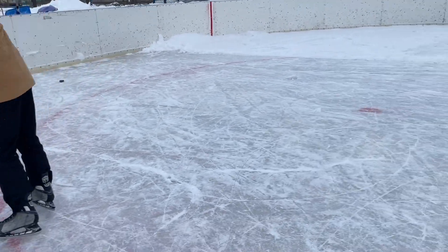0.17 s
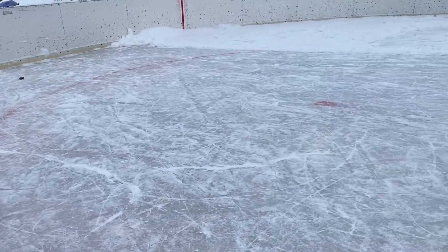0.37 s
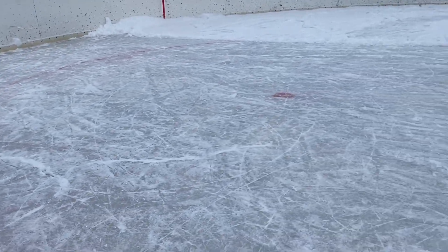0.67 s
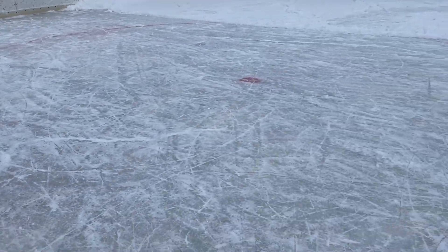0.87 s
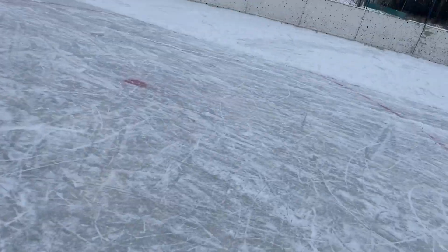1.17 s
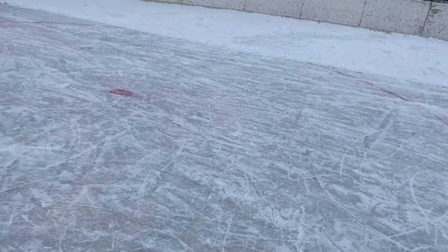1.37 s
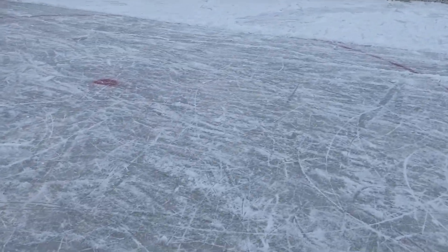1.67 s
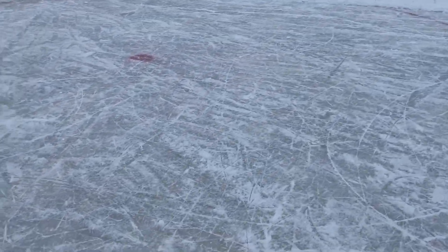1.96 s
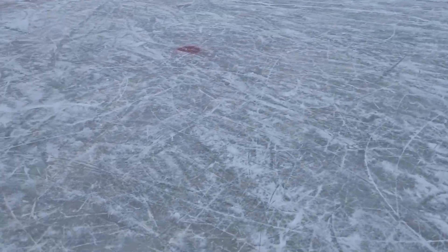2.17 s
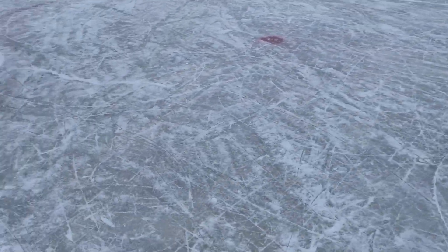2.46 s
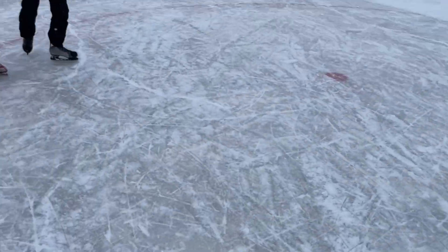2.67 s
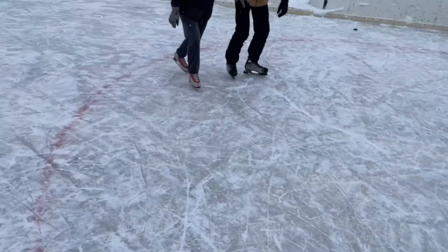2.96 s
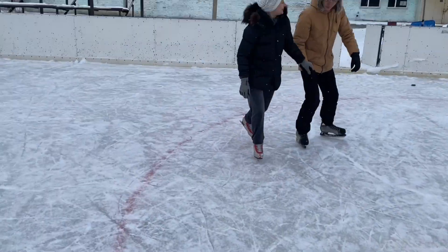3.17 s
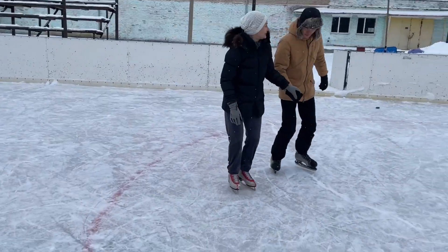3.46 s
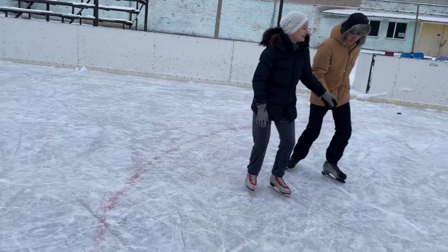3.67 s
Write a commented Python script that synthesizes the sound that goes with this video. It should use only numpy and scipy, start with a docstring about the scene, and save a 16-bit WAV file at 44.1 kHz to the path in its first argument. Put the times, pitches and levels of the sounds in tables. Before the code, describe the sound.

Skate blades crackle steadily on outdoor rink ice; low knocks come first, then a loud close edge scrape near one second, then repeated gritty strokes and clicks. Close stereo phone microphone, slightly stronger on the left.

```python
"""Outdoor ice rink: two skaters shuffle near a phone. Their blades crush the ice in dense random grains,
coloured into scraping strokes and a steady crackle; one edge bites close by and rings its steel and boot.
Knocks cross the ice sheet as dispersive bending waves, treble first, and arrive as short falling chirps.
Blade clicks are brief bursts of noise, a tapped runner is two decaying sines, and the gliding blades'
rumble is dispersed grain noise."""
import sys
import numpy as np
from scipy import signal
from scipy.fft import rfft, irfft
from scipy.io import wavfile
from scipy.ndimage import map_coordinates

SR = 44100
rng = np.random.default_rng(int(sys.argv[2]) if len(sys.argv) > 2 else 0)


def master_out(mix):
    """Clip the mix to full scale and print it as 16-bit PCM to the path in sys.argv[1]."""
    frames = np.transpose(np.atleast_2d(mix))
    ceiling = np.clip(frames, -1, 1)
    pcm = np.round(ceiling * 32767).astype(np.int16)
    wavfile.write(sys.argv[1], SR, pcm)


N = 167580  # samples in the scene
BLOCK, LEAD_S = 16384, 0.04  # samples in an event's block, and its time before the event
SIDES = np.array([[1], [-1]])  # left, right

# Blade contact: length of the linear attack, time constant of the release
ATTACK_S, RELEASE_S = 0.0093, 0.012
# Widths of resonances: standard deviation of a bell curve in octaves
BODY_OCTAVES, RASP_OCTAVES, KNOCK_OCTAVES, CLICK_OCTAVES = 0.62, 0.12, 0.76, 0.85
TRAVEL_S = 0.005  # travel time through the ice at 1 kHz

# Ring of runner and holder: level against the direct crack before its bass is cut, time constant
SKATE_RING_DB, SKATE_DECAY_S = -6.5, 0.0068
CRACK_DB = -8  # coarse cracks against fine grit
RASP_DB = 6  # gain of the edge resonance
WOBBLE, WOBBLE_HZ = 0.024, 14  # rms shift as a share of the rasp's pitch, and its rate

STEEL_T60_S = 0.25  # time for ringing steel to fall 60 dB
RING_DB = -18  # ringing modes against the direct steel sound
STEEL_DB, BOOT_DB = 1.5, 2  # gains added to the level curves of the bite
BITE_PAN_DB, GLIDE_PAN_DB, STROKE_PAN_DB = 3.5, 3.5, 1.5  # left over right, where the share is 1

JUDDER_DB, JUDDER_S = -13, 0.016  # judder rms against the chirp peak, time constant either side of the knock
CLICK_DECAY_S = 0.0023  # time constant
PING_S, PING_DB = 3.323, -35.5  # onset, and initial ceiling of the summed partials
TOP_HZ = 14000  # edge of the low-pass


def undb(db):
    """Level: decibels to an amplitude ratio."""
    return 10 ** (np.asarray(db) / 20)


def unit(x):
    """Normalisation: scale to rms 1."""
    return x / np.sqrt(np.mean(x ** 2))


def freqs(size):
    """Discrete spectrum: frequency of each bin, at least 1 Hz."""
    return np.maximum(np.arange(size // 2 + 1) * SR / size, 1)


def over_hz(points, size):
    """Logarithmic frequency scale: join (frequency [Hz], value) points along it."""
    hz, value = np.array(points).T
    return np.interp(np.log(freqs(size)), np.log(hz), value)


def colour(points, size):
    """Spectral shaping: gain through the points, falling steeply below the first."""
    corner_hz = 0.7 * points[0][0]
    bass_cut = np.sqrt(1 + (corner_hz / freqs(size)) ** 4)
    return undb(over_hz(points, size)) / bass_cut


def hump(hz, octaves):
    """Broad resonance: a bell-shaped gain on the octave scale."""
    distance = np.log2(freqs(BLOCK) / hz) / octaves
    return np.exp(-0.5 * distance ** 2)


def curve(rows, axis=1):
    """Amplitude envelope: gain over time, interpolated in decibels."""
    rows = np.array(rows)
    return undb(np.interp(np.arange(N) / SR, rows[:, 0], rows[:, axis]))


def gate(t, length):
    """Contact envelope: linear attack, hold and exponential release of a blade."""
    attack = np.clip(t / ATTACK_S + 0.5, 0, 1)
    release = np.exp(-np.maximum(t - length, 0) / RELEASE_S)
    return attack * release


def walk(rate, size):
    """Low-pass noise: smooth random variation with rms 1."""
    spectrum = rfft(rng.standard_normal(size))
    return unit(irfft(spectrum / (1 + (freqs(size) / rate) ** 4)))


def crush(rate, spread_db, chatter_db, chatter_hz, size=N):
    """Shot noise: ice grains break at random, their strength modulated as the edge sticks and slips.

    Returns spectra of direct and scattered sound; rate is in grains per second."""
    spread = spread_db * np.clip(rng.standard_normal(size), -2, 2)
    chatter = chatter_db * np.clip(walk(chatter_hz, size), -2, 2)
    breaks = rng.random(size) < rate / SR
    return rfft(rng.standard_normal((2, size)) * undb(spread + chatter) * breaks)


def skate(size):
    """Impulse response of a skate: direct crack and a short dense ring, drawn afresh at each call."""
    tail = rng.standard_normal(BLOCK) * np.exp(-np.arange(BLOCK) / SR / SKATE_DECAY_S)
    ring = rfft(tail, size) / np.sqrt(np.sum(tail ** 2))
    return 1 + undb(SKATE_RING_DB) * ring / (1 + 400 / freqs(size))  # bass of the ring cut below 400 Hz


def wobble(sound):
    """Frequency modulation: uneven reading speed lets the rasp drift as the blade rocks."""
    place = np.cumsum(1 + WOBBLE * walk(WOBBLE_HZ, BLOCK))
    return np.array([map_coordinates(side, [place], mode="mirror") for side in sound])


def bend(size):
    """Dispersion of bending waves in ice: travel time falls with the root of frequency."""
    return np.exp(-4j * np.pi * TRAVEL_S * np.sqrt(1000 * freqs(size)))


def ports(pair, gain, pan_db=0):
    """Partial coherence: direct sound is shared by both microphones, scattered sound is opposed; rms 1."""
    # Scattered sound: (frequency [Hz], gain [dB])
    diffuse = [(150, -14.5), (800, -3), (10000, -17)]
    # Left-right level difference: (frequency [Hz], share of the pan [ratio])
    pan_share = [(100, 0.13), (1200, 0.19), (2400, 0.5), (4300, 1.34), (7500, 0.084)]
    size = 2 * len(gain) - 2
    both = pair[0] + SIDES * pair[1] * undb(over_hz(diffuse, size))
    pan = undb(SIDES * pan_db * over_hz(pan_share, size) / 2)
    return unit(irfft(both * gain * pan))


def ages():
    """Time origin: seconds since an event, over its block."""
    return np.arange(BLOCK) / SR - LEAD_S


def add(out, sound, at):
    """Superposition: mix an event's block in at its time."""
    i = int((at - LEAD_S) * SR)
    a, b = max(i, 0), min(i + BLOCK, N)
    out[:, a:b] += sound[..., a - i:b - i]


def strokes():
    """Fracture noise and resonance: pushes shave gritty hiss with a drifting rasp; cracks cross the sheet."""
    # Scraping strokes: (start [s], length [s], hiss level at mid-stroke [dB], swell over the stroke [dB],
    # ice body level [dB], body resonance [Hz], rasp resonance [Hz])
    stroke_rows = [(-.01, 0.11, -41.5, -15, -64, 800, 2420), (0.113, 0.062, -40, -10, -46.5, 880, 2640),
                   (1.223, 0.097, -43, -4, -43.5, 1000, 5800), (1.813, 0.14, -36, 0.5, -38, 700, 1820),
                   (1.95, 0.16, -36.5, 5.5, -37, 390, 5100), (2.146, 0.23, -41, 4, -42, 267, 4700),
                   (2.458, 0.043, -34.5, 1.5, -37.5, 614, 1520), (2.509, 0.058, -38.5, 11, -44, 497, 1390),
                   (2.613, 0.082, -38, 7, -32.5, 420, 4080), (2.711, 0.043, -32, 1, -29.5, 1120, 4380),
                   (2.785, 0.13, -36.5, 0, -42, 445, 986), (2.996, 0.067, -37.5, 5, -46.5, 660, 1130),
                   (3.057, 0.034, -37, 14, -36, 890, 1190), (3.263, 0.097, -39, 7.5, -50.5, 586, 2040),
                   (3.423, 0.09, -36, 10, -36.5, 696, 2700), (3.534, 0.11, -38.5, -1, -36, 700, 810)]
    # Spectrum of shaved ice: (frequency [Hz], relative density [dB per Hz])
    hiss_colour = [(340, 8.5), (720, 0.5), (1250, 3), (1850, -2.5), (2450, 1), (3400, -7), (4400, -4),
                   (6000, -14.5), (8500, -12.5), (14000, -22)]
    t, out = ages(), np.zeros((2, N))
    shade, sheet = colour(hiss_colour, BLOCK), bend(BLOCK)
    for start, length, hiss_db, swell_db, body_db, body_hz, rasp_hz in stroke_rows:
        fine = crush(rate=5400, spread_db=0.5, chatter_db=1.5, chatter_hz=140, size=BLOCK) * skate(BLOCK)
        coarse = crush(rate=350, spread_db=1.0, chatter_db=0.8, chatter_hz=81, size=BLOCK)
        grit = shade * (fine / np.std(fine) + undb(CRACK_DB) * coarse / np.std(coarse))
        rasp = rfft(wobble(irfft(grit * hump(rasp_hz, RASP_OCTAVES))))
        scrape = ports(grit + undb(RASP_DB) * rasp, np.ones(len(shade)), STROKE_PAN_DB)
        swell = undb(hiss_db + swell_db * (np.clip(t / length, 0, 1) - 0.5))
        body = ports(coarse * sheet, shade * hump(body_hz, BODY_OCTAVES), STROKE_PAN_DB)
        add(out, gate(t, length) * (swell * scrape + undb(body_db) * body), start)
    return out


def bite():
    """Forced modal vibration: a close edge digs in; its chatter rings the steel runner and hollow boot."""
    # Close edge: (time [s], steel level before added gain [dB], boot level before added gain [dB])
    bite_levels = [(0.78, -54, -43), (0.932, -23, -30), (.968, -24.5, -29.5), (1.035, -35, -31.5),
                   (1.097, -33.5, -36.5), (1.14, -45, -49)]
    # Spectra of steel and boot: (frequency [Hz], relative density [dB per Hz])
    steel_colour = [(1500, -11), (2150, 0.5), (2650, 4.5), (3300, -13.5), (4450, 2), (5500, -17),
                    (6400, -13), (7300, -15.5), (10000, -12.5), (14000, -39)]
    boot_colour = [(250, -25), (450, -7), (980, 2.5), (1300, -6.5), (1900, -28)]
    # Runner modes before the steel colour: (frequency [Hz], relative height [dB])
    steel_modes = [(2167, 17), (2398, -15), (2478, 5), (2592, 10), (4400, 5)]
    grains = crush(rate=9000, spread_db=0.0, chatter_db=3.5, chatter_hz=161)
    shade = colour(steel_colour, N)
    half_width_hz = np.log(1000) / (2 * np.pi * STEEL_T60_S)
    modes = sum(undb(db) / (1 + 1j * (freqs(N) - hz) / half_width_hz) for hz, db in steel_modes)
    direct = ports(grains * skate(N), shade, BITE_PAN_DB)
    ringing = ports(grains, modes * shade, BITE_PAN_DB)
    steel = direct + undb(RING_DB) * ringing
    boot_grains = crush(rate=2300, spread_db=3.0, chatter_db=1.5, chatter_hz=90)
    boot = ports(boot_grains, colour(boot_colour, N), BITE_PAN_DB)
    start, end = bite_levels[0][0], bite_levels[-1][0]
    contact = gate(np.arange(N) / SR - start, end - start)
    steel = undb(STEEL_DB) * steel * curve(bite_levels)
    boot = undb(BOOT_DB) * boot * curve(bite_levels, axis=2)
    return contact * (steel + boot)


def knocks():
    """Dispersion: weight lands or a blade crosses a rut; the ice spreads one push into a falling chirp."""
    # Knocks through the ice: (time [s], chirp peak without judder [dB], band centre before bass tilt [Hz])
    knock_rows = [(0.483, -24, 223), (0.497, -18, 101), (0.556, -16.5, 221), (0.681, -25.5, 153),
                  (.797, -27.5, 230), (1.435, -21.5, 118), (1.474, -28, 230), (1.818, -24, 577),
                  (1.836, -20.5, 198), (1.991, -20, 447), (2.311, -24.5, 265), (2.35, -23, 290),
                  (2.39, -24.5, 129), (2.77, -27.5, 88), (2.876, -26, 377), (3.21, -31, 527),
                  (3.417, -27, 800), (3.499, -24.5, 257), (3.575, -22.5, 280), (3.702, -31, 630),
                  (3.788, -28.5, 470)]
    out, sheet, f = np.zeros((2, N)), bend(BLOCK), freqs(BLOCK)
    shake = undb(JUDDER_DB) * np.exp(-np.abs(ages()) / JUDDER_S)
    for at, db, hz in knock_rows:
        band = hump(hz, KNOCK_OCTAVES) / np.sqrt(f)
        # Strike early, so that the centre frequency arrives at the listed time
        struck_s = LEAD_S - TRAVEL_S * np.sqrt(1000 / hz)
        chirp = irfft(band * sheet * np.exp(-2j * np.pi * f * struck_s))
        judder = shake * ports(rfft(rng.standard_normal((2, BLOCK))), band)
        add(out, undb(db) * (chirp / np.abs(chirp).max() + judder), at)
    return out


def clicks():
    """Impulsive excitation: a blade taps the ice with a few milliseconds of band-shaped noise."""
    # Blade taps: (time [s], peak level [dB], centre frequency [Hz])
    click_rows = [(.885, -16, 1600), (1.006, -14, 820), (1.486, -22, 1120), (1.524, -21.5, 1230),
                  (1.669, -19.5, 1050), (2.452, -15.5, 1000), (2.477, -21, 1000), (2.698, -19, 2300),
                  (3.064, -21, 1500), (3.208, -28, 1090), (3.701, -27, 2200)]
    out, t = np.zeros((2, N)), ages()
    fade = (t > 0) * np.exp(-np.abs(t) / CLICK_DECAY_S)
    for at, db, hz in click_rows:
        crack = ports(rfft(rng.standard_normal((2, BLOCK)) * fade), hump(hz, CLICK_OCTAVES))
        add(out, undb(db) * crack / np.abs(crack).max(), at)
    return out


def ping():
    """Free vibration: a lightly tapped runner, clear of the ice, rings on in decaying partials."""
    # Partials of the runner: frequency [Hz]
    partials = [3100, 4080]
    out, t = np.zeros((2, N)), np.maximum(ages(), 0)
    ring = np.mean([np.sin(2 * np.pi * hz * t) for hz in partials], axis=0)
    decay = np.exp(-np.log(1000) * t / STEEL_T60_S)
    add(out, undb(PING_DB) * ring * decay, PING_S)
    return out


def glide():
    """Shot noise and dispersion: flat blades crackle finely and raise a rumble in the ice sheet."""
    # Steady glide and sheet rumble: (time [s], level [dB])
    glide_levels = [(0, -42), (.45, -37), (1.2, -37.5), (1.54, -37.5), (1.63, -41.5), (1.78, -38),
                    (2.2, -37), (2.42, -40), (3.2, -43), (3.7, -43.5)]
    rumble_levels = [(0, -41.5), (.4, -42.5), (.6, -38), (.92, -47), (1.18, -42), (1.85, -39.5),
                     (2.2, -51.5), (2.385, -31), (2.48, -57), (3.3, -50.5), (3.8, -42.5)]
    # Their spectra: (frequency [Hz], relative density [dB per Hz])
    glide_colour = [(200, -1), (420, 4), (1100, -1.5), (1800, -6.5), (2650, -8.5), (4700, -14.5),
                    (6500, -19.5), (14000, -29.5)]
    rumble_colour = [(22, -37), (40, -4), (70, 4.5), (250, -9), (800, -37.5)]
    fine = crush(rate=16000, spread_db=4.0, chatter_db=2.03, chatter_hz=57.5) * skate(N)
    crackle = ports(fine, colour(glide_colour, N), GLIDE_PAN_DB)
    coarse = crush(rate=1500, spread_db=2.0, chatter_db=3.5, chatter_hz=24.6) * bend(N)
    rumble = ports(coarse, colour(rumble_colour, N))
    return crackle * curve(glide_levels) + rumble * curve(rumble_levels)


def scene():
    """Superposition: all the sounds of the skates."""
    return strokes() + bite() + knocks() + clicks() + ping() + glide()


def record(dry):
    """Interaural-style phase difference: the phone's two ports shift against each other; the top is cut."""
    # Phase between the ports: (frequency [Hz], lead of the left [rad])
    port_phase = [(1900, 0.15), (3200, 1.1), (4200, 0.3), (5400, 1), (6600, -.6), (8200, -3.1),
                  (11000, -6.2), (12500, -6.3), (14000, -9.2)]
    turn = np.exp(0.5j * SIDES * over_hz(port_phase, N))
    turned = irfft(rfft(dry) * turn, N)
    low_pass = signal.ellip(8, 0.2, 70, TOP_HZ, fs=SR, output="sos")
    return signal.sosfilt(low_pass, turned)


dry = scene()
out = record(dry)
master_out(out)
```